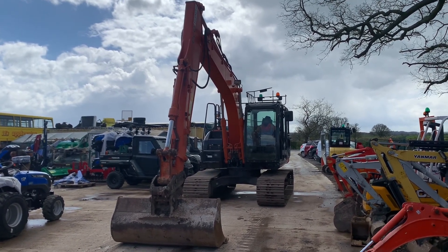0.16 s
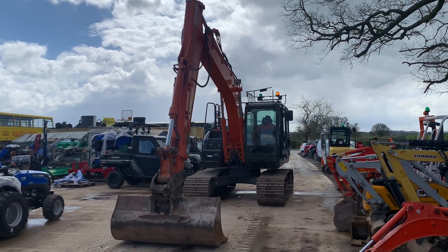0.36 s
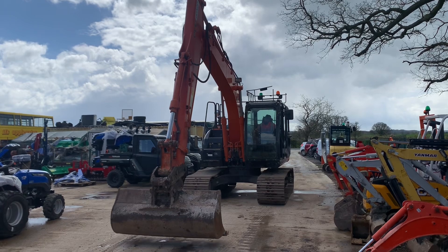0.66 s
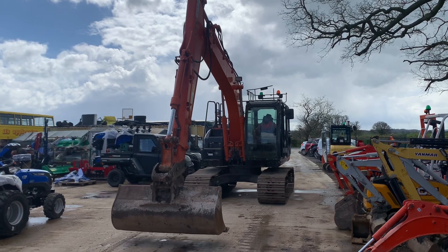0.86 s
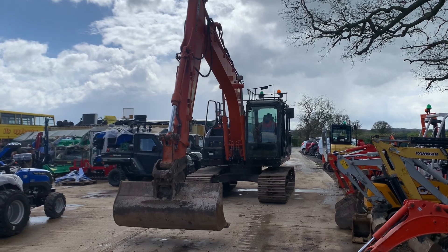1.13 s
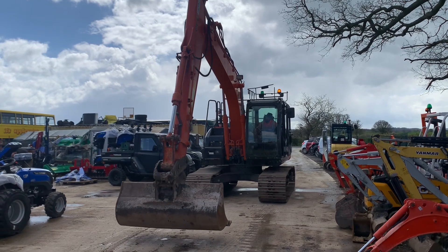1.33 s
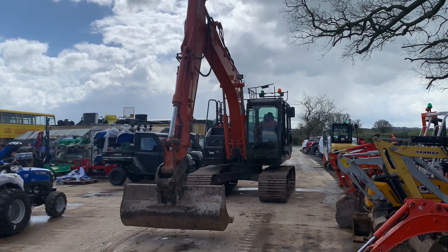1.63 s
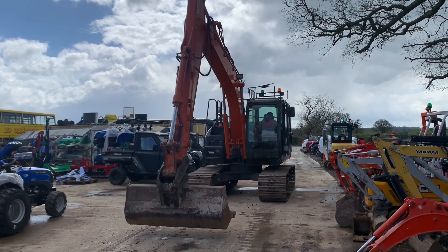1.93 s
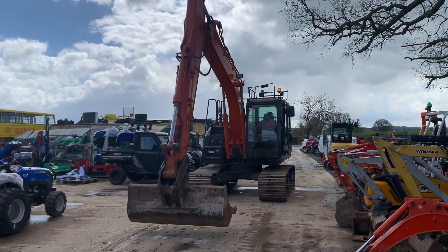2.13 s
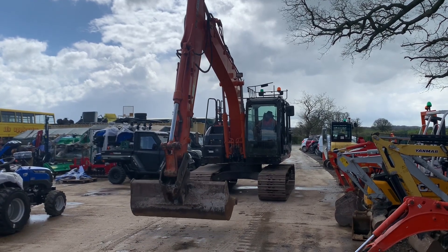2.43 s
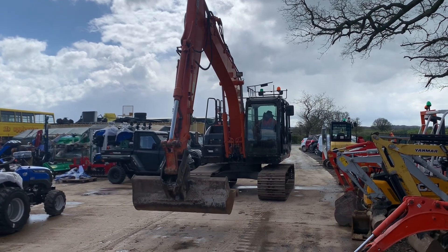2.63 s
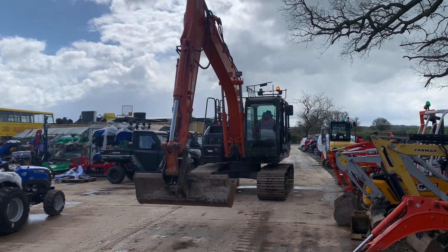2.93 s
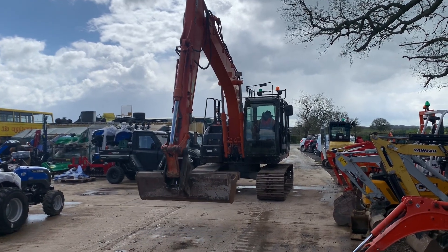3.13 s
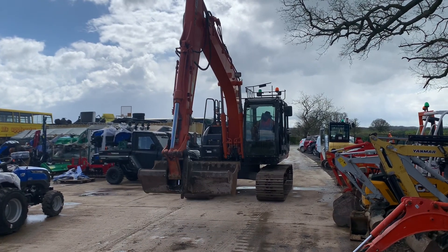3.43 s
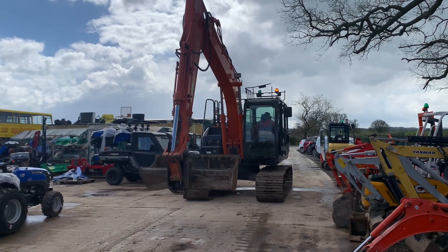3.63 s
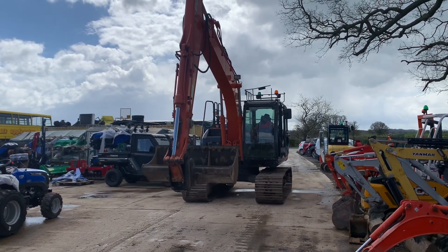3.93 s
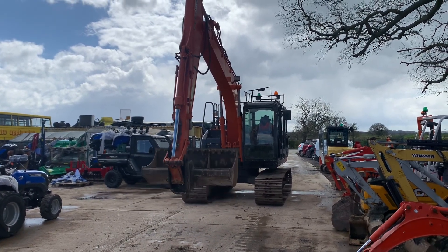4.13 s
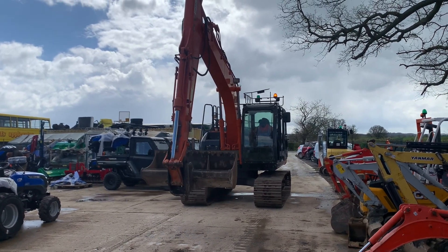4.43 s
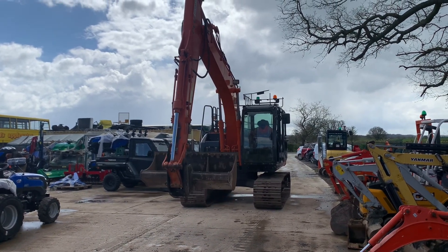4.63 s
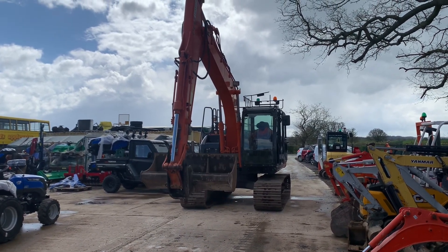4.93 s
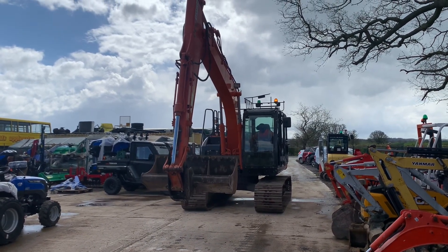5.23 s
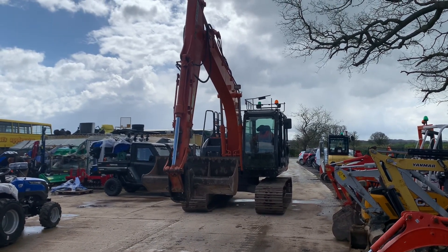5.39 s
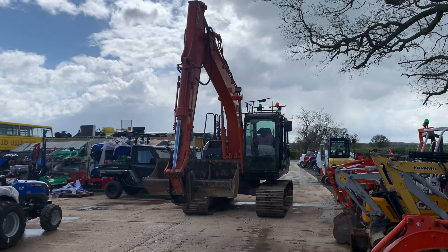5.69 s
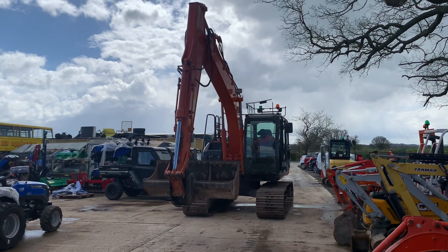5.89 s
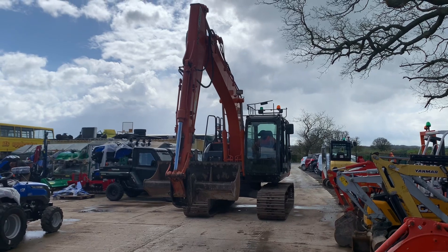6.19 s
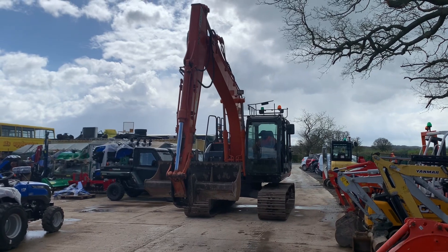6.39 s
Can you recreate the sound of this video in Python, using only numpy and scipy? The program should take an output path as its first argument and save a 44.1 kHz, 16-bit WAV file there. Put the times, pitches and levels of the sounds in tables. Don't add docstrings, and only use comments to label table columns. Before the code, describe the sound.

A distant excavator diesel drones steadily in a windy open yard, with faint hydraulic whistles, brief pin squeaks and a burst of dull metal clunks midway.

```python
import sys
import numpy as np
from scipy import signal
from scipy.fft import rfft, irfft, next_fast_len
from scipy.io import wavfile
from scipy.ndimage import uniform_filter1d, minimum_filter1d

SR = 44100
rng = np.random.default_rng(int(sys.argv[2]) if len(sys.argv) > 2 else 0)


def amplitude_ratio(level_db):
    exponent = np.asarray(level_db, float) / 20
    return 10 ** exponent


def digitize_waveform(pressure):
    field = np.atleast_2d(pressure).T
    bounded = np.clip(field, -1, 1)
    quanta = np.round(bounded * 32767).astype(np.int16)
    wavfile.write(sys.argv[1], SR, quanta)


N = 288855
T = np.arange(N) / SR

# t/s, pump load (0-1), valve opening (0-1)
WORK = [(0, 0.2, 0.9), (.5, 0.7, 1), (.85, 0.9, 0.71), (1.1, .95, 0.97), (1.6, 0.7, 0.82), (2.3, 0.9, 0.87),
        (2.7, 0.9, 0.92), (3.2, 0.06, 0.92), (3.9, 0, 0.64), (4.1, 0.6, 0.9), (4.7, 0.01, 0.7),
        (4.87, 0, 0.5), (5.05, 0.04, 0), (5.7, 0.03, .05), (5.97, 0.2, 0.4), (6.25, 0.5, 0.3),
        (6.55, 0.3, 0.4)]
CYLINDER_KNOCKS = [0, -5, -3, -6]


def evened(x):
    return x / np.sqrt(np.mean(x ** 2) + 1e-20)


def read(points, hz):
    f, value = np.transpose(points)
    return np.interp(np.log(hz + 1), np.log(f + 1), value)


def column(rows, count):
    return np.interp(T, np.transpose(rows)[0], np.transpose(rows)[count])


def shape(x, gain):
    size = next_fast_len(x.shape[-1] + 2048)
    spectrum = rfft(x, size) * gain(np.fft.rfftfreq(size, 1 / SR))
    return irfft(spectrum, size)[..., :x.shape[-1]]


def drift(hz):
    coarse = shape(rng.standard_normal(N // 32 + 1), lambda f: np.exp(-(f / 32 / hz) ** 2))
    return np.interp(T, np.arange(len(coarse)) * 32 / SR, evened(coarse))


def resonate(x, hz, width):
    r = np.exp(-np.pi * width / SR)
    pole = [1, -r * np.exp(2j * np.pi * hz / SR)]
    return 2 * signal.lfilter([(1 - r) ** 2], np.convolve(pole, pole), x).real


def add(mix, s, sound):
    part = mix[..., round(s * SR):][..., :sound.shape[-1]]
    part += sound[..., :part.shape[-1]]


def engine():
    # t/s, firing rate f/Hz
    firing = [(0, 46.5), (1.0, 46.6), (1.6, 47.4), (2.0, 46.8), (2.7, 46.8), (3.0, 47.4), (4.9, 47.4),
              (5.6, 47.1), (6.55, 47.0)]
    # multiple of the firing rate, rms level/dB
    pump = [(10, -61), (13.5, -57), (18, -59), (27, -65), (31.5, -66), (36, -65), (37.5, -66), (45, -69)]
    # multiple of the firing rate, level/dB re hum
    overtones = [(2, -14.5), (3, -15), (4, -21)]
    turns = np.cumsum(column(firing, count=1) + .05 * drift(3)) / SR
    hum_db, wobble_db = -27.5, -0.56
    hum = amplitude_ratio(hum_db + wobble_db * drift(4.4)) * np.sqrt(2) * np.sin(2 * np.pi * turns)
    for k, db in overtones:
        level = amplitude_ratio(hum_db + db + 3.5 * drift(6.5)) * np.sqrt(2)
        hum = hum + level * np.cos(2 * np.pi * k * turns + 0.72 * drift(2.2))

    cylinder = turns.astype(int) % len(CYLINDER_KNOCKS)
    blow = amplitude_ratio(np.take(CYLINDER_KNOCKS, cylinder) + 2.0 * drift(25))
    since = turns % 1
    noise = rng.standard_normal((2, N))
    gated = noise * (1 + .5 * blow * np.exp(-since / 5.0)) * amplitude_ratio(0.46 * drift(5.3))
    load, valve = column(WORK, count=1), column(WORK, count=2)
    knock_db = -61 + 14.5 * load
    loaded = np.clip((knock_db + 62) / 9 + .15 * drift(2), .4, 1)
    clatter = panelled(gated, loaded)
    clatter = clatter / shape(clatter, lambda f: (f > 1150) & (f < 2300)).std()
    clatter = clatter * amplitude_ratio(-54 + 1.5 + 3.5 * load + 3.5 * valve)

    whine = np.zeros(N)
    for k, db in pump:
        level = amplitude_ratio(db - 4.5 + 5.2 * drift(12)) * np.sqrt(2)
        whine = whine + level * np.sin(2 * np.pi * k * turns + 1.2 * drift(5.0))
    whine = whine * loaded
    return hum, clatter + hood(turns) + np.array([whine, np.roll(whine, 700)])


def panelled(x, loaded):
    # f/Hz, level/dB per Hz
    clatter_spectrum = [(60, 25.5), (200, 22), (300, 4), (430, 4), (640, 5), (740, 1.5), (850, 5),
                        (1000, 1.5), (1600, 0.5), (2150, -6.5), (2600, -13), (3300, -13.5), (4300, -26),
                        (7000, -53)]
    # f/Hz, width/Hz, level/dB over the clatter
    panels = [(500, 19, 4), (630, 14, 4), (822, 78, 8.5), (1282, 11, 9), (1479, 49, 8.5), (1690, 14, 1.5),
              (1826, 17, 12), (2080, 76, 9), (3560, 240, 3)]
    patch_db, patch_hz, patch_s = 1.5, 130, .3
    hz, t, z = signal.stft(x, SR, nperseg=2048, noverlap=1536)
    patches = rng.standard_normal(z.shape[1:])
    for _ in range(2):
        patches = uniform_filter1d(patches, round(patch_hz / hz[1]), axis=0)
        patches = uniform_filter1d(patches, round(patch_s / t[1]), axis=1)
    db = read(clatter_spectrum, hz)[:, None] + patch_db * evened(patches)
    at = np.minimum((t * SR).astype(int), N - 1)
    for f, width, top_db in panels:
        throb = .2 * np.sin(2 * np.pi * (7 * t + rng.random()))
        share = loaded[at] * np.clip(1 + .18 * drift(1.5)[at] + throb, 0, 1.6)
        centre = f * (1 + .005 * drift(3.9)[at])
        db = db + 4 * (1 - loaded[at]) / len(panels)
        db = db + top_db * share / (1 + (2 * (hz[:, None] - centre) / width) ** 2)
    return signal.istft(z * amplitude_ratio(db), SR, nperseg=2048, noverlap=1536)[1][:, :N]


def hood(turns):
    # f/Hz, width/Hz, level/dB, place in the cycle (firings)
    hood_parts = [(851, 45, -53, 3.4), (480, 49, -57.5, 1.5), (485, 25, -61.5, 3.2),
                  (625.8, 40, -57.5, 2.9), (616, 40, -60.5, 1.2), (1737, 56, -62.5, 3.0),
                  (1283, 60, -64.5, 1.7)]
    # t/s, level/dB
    shake = [(0, 1.5), (1.1, 3.5), (1.4, -3.5), (2.0, 1), (2.7, 0), (3.0, -4.5), (3.4, 1), (3.85, 0.5),
             (4.7, -5), (5.6, -10), (5.9, 2), (6.1, 1), (6.25, -5), (6.55, -2)]
    out, noise = 0, rng.standard_normal((2, N))
    for hz, width, db, place in hood_parts:
        cycle = (turns - place) / len(CYLINDER_KNOCKS)
        struck = np.diff(cycle // 1, prepend=-1) > 0
        rattle = .2 / 20 * noise * np.exp(-(cycle % 1) / 0.13)
        out = out + amplitude_ratio(db + 1 * drift(6.7)) * evened(resonate(struck + rattle, hz, width))
    return out * amplitude_ratio(column(shake, count=1))


def hydraulics():
    # f/Hz, level/dB per Hz
    hiss_spectrum = [(1500, -2), (3000, -0.5), (4000, 0.5), (5000, -0.5), (6300, -2), (8000, -8.5),
                     (10000, -19), (12000, -47.5)]
    # f/Hz, width/Hz, level/dB over the hiss
    strands = [(3270, 70, 5), (3470, 80, 4), (3850, 50, 7), (4090, 50, 6), (4200, 50, 6), (4390, 40, 6)]
    # start t/s, length/s, f/Hz, width/Hz, level/dB
    whistles_and_scrapes = [(.9, .35, 5820, 300, -74), (1.15, .45, 4180, 45, -69.5), (1.3, .25, 3490, 100, -70),
                            (1.36, .22, 3820, 60, -62.5), (1.35, .25, 7700, 90, -84), (1.4, .25, 8650, 90, -89),
                            (1.6, .32, 4085, 35, -61.5), (1.62, .22, 5030, 150, -74), (1.85, .14, 4040, 70, -65),
                            (1.98, .15, 3990, 80, -66), (1.99, .28, 3480, 55, -58), (2.0, .3, 3270, 90, -68),
                            (2.33, .15, 3930, 110, -68), (2.1, .4, 3825, 50, -69), (2.1, .3, 7730, 70, -77),
                            (2.2, .35, 4180, 50, -74), (2.3, .35, 3420, 130, -65), (2.78, .1, 4050, 140, -68),
                            (2.78, .12, 4300, 130, -70), (2.82, .35, 7750, 100, -80), (2.88, .11, 3760, 80, -62),
                            (2.95, .2, 3590, 120, -62), (2.8, .17, 3400, 90, -65), (2.95, .16, 3220, 80, -66),
                            (3.15, .35, 3480, 110, -69), (3.2, .6, 8650, 90, -89),
                            (3.99, .11, 1250, 380, -43), (4.2, .07, 4100, 220, -65), (4.38, .2, 5150, 200, -75),
               (4.44, .1, 1500, 700, -51), (4.44, .08, 3300, 1100, -60), (4.56, .12, 3300, 900, -61),
               (4.5, .3, 4000, 1600, -66), (4.55, .15, 1900, 700, -53), (1.3, .3, 5750, 250, -78),
               (5.435, .005, 6300, 1200, -75), (1.55, .55, 4190, 45, -69.5), (1.5, .14, 3960, 60, -69),
               (2.0, .2, 3600, 60, -68), (2.25, .35, 3480, 60, -66), (1.1, .2, 4080, 50, -72),
               (2.25, .85, 5750, 300, -77), (2.3, .5, 3250, 130, -69)]
    # start t/s, length/s, f/Hz, level/dB
    squeaks = [(3.751, .009, 2120, -45), (3.751, .01, 3620, -57), (3.897, .022, 3860, -55),
               (3.878, .018, 2040, -44), (3.884, .016, 2720, -53), (4.462, .03, 2900, -60),
               (3.56, .065, 3630, -52), (3.625, .04, 3635, -63), (3.94, .04, 3625, -55),
               (3.985, .018, 3550, -59), (4.006, .02, 3600, -56), (4.03, .015, 3600, -65)]

    def hiss_gain(f):
        peaks = sum(db / (1 + (2 * (f - hz) / width) ** 2) for hz, width, db in strands)
        return amplitude_ratio(read(hiss_spectrum, f) + peaks)

    oil = shape(rng.standard_normal((2, N)) * amplitude_ratio(0.53 * drift(13)), hiss_gain)
    oil = oil / shape(oil, lambda f: (f > 4400) & (f < 7500)).std()
    oil = oil * amplitude_ratio(-83.5 + 12.5 * column(WORK, count=2))

    flutter = drift(14)
    wander = 1 + .003 * drift(7)
    for s, length, hz, width, db in whistles_and_scrapes:
        s, length = s - .04, length + .08
        fuzz = rng.standard_normal((2, 2, round(length * SR)))
        fuzz = shape(fuzz, lambda f: np.exp(-(f / width) ** 2))
        pitch = hz * wander[round(s * SR):][:fuzz.shape[-1]]
        turn = np.exp(2j * np.pi * np.cumsum(pitch) / SR)
        tone = evened(((fuzz[0] + 1j * fuzz[1]) * turn).real)
        swell = signal.windows.tukey(len(turn), .7) * amplitude_ratio(.5 * flutter[round(s * SR):][:len(turn)])
        add(oil, s, amplitude_ratio(db) * tone * swell)

    waver = drift(40)
    for s, length, hz, db in squeaks:
        pitch = hz + 12 * waver[round(s * SR):][:round(length * SR)]
        turn = 2 * np.pi * np.cumsum(pitch) / SR
        tone = np.sqrt(2) * np.array([np.sin(turn), np.cos(turn)])
        add(oil, s, amplitude_ratio(db) * tone * signal.windows.tukey(len(turn), .6))
    return oil


def clunks():
    # t/s, middle ring level/dB, low ring level/dB, bright ring level/dB, t60/s
    knocks = [(3.74, -35.5, -47, -69.5, 0.045), (3.755, -37, -47, -68, 0.02),
              (3.871, -38, -33.5, -60, 0.16), (3.883, -28, -29.5, -44.5, 0.18),
              (3.904, -25, -37.5, -62, 0.088), (4.003, -56, -25, -59, 0.18), (4.03, -45, -41, -53.5, 0.26),
              (4.154, -28.5, -45.5, -45, 0.22), (4.166, -30.5, -35.5, -48, 0.29),
              (4.486, -38, -66, -57, 0.46), (5.069, -58, -53, -61, 0.12), (5.412, -47, -47, -59, 0.2),
              (5.925, -41, -32, -64, 0.082), (6.035, -44, -33.5, -66, 0.037), (6.357, -50, -45, -61, 0.069)]
    # f/Hz, width/Hz, level/dB
    steel = [
        [(580, 110, 0), (820, 90, -9)],
        [(1220, 380, 0), (1650, 300, -7), (2050, 300, -7), (2700, 500, -14)],
        [(3400, 600, 0), (3900, 350, -3), (4500, 600, -10), (5500, 1200, -21), (7400, 900, -22)],
    ]
    mode_gap_hz = 40
    out, t = np.zeros((2, N)), np.arange(SR // 2) / SR
    peaks = amplitude_ratio(3.8 * rng.standard_normal(SR // 2 // mode_gap_hz + 1).clip(-1.5, 2))
    for s, mid_db, low_db, bright_db, t60 in knocks:
        grit = amplitude_ratio(2.2 * np.interp(t / .004, np.arange(200), rng.standard_normal(200)))
        rattle = shape(grit * rng.standard_normal((2, len(t))),
                       lambda f: np.interp(f / mode_gap_hz, np.arange(len(peaks)), peaks))
        ringing = amplitude_ratio(-60 * t / t60)
        impact = .1 * np.exp(-t / .004)
        echo = amplitude_ratio(-17 - 60 * t / .35)
        fade = (1 - np.exp(-t / .002)) * (ringing + impact + echo)
        for db, modes in zip([low_db, mid_db, bright_db], steel):
            ring = shape(rattle, lambda f: sum(amplitude_ratio(g) * np.exp(-((f - hz) / w) ** 2) for hz, w, g in modes))
            add(out, s, amplitude_ratio(db - 6) * fade * evened(ring))
    return shape(out, lambda f: 1 / (1 + (f / 8500) ** 6))


def tinkles():
    # t/s, peak level/dB, t60/s
    rattles = [(3.815, -72, .05), (4.465, -72, .25), (4.61, -70, .2), (5.062, -79, .2), (5.41, -76, .2),
               (4.155, -72, .1)]
    out, t = np.zeros((2, N)), np.arange(SR // 4) / SR
    for s, db, t60 in rattles:
        grain_db = 2.5 * rng.exponential(1, len(t) // 128 + 1).clip(0, 4)
        grains = rng.standard_normal((2, len(t))) * amplitude_ratio(grain_db).repeat(128)[:len(t)]
        ring = shape(grains, lambda f: np.exp(-((f - 7200) / 2600) ** 2))
        add(out, s, amplitude_ratio(db - 60 * t / t60) * np.minimum(t / .006, 1) * evened(ring))
    return out


def wind():
    # t/s, peak level/dB, f/Hz
    slaps = [(0.044, -21.5, 396), (0.074, -15, 294.5), (0.09, -12, 332), (0.1034, -0.5, 340),
             (0.131, -8.5, 398), (0.193, -6, 262), (0.219, -6, 407), (0.29, -12, 295), (0.31, -18.5, 328),
             (0.345, -17.5, 425), (0.369, -14, 261), (0.393, -12, 246.5), (0.421, -13.5, 241),
             (0.455, -14, 332), (0.503, -20, 348), (0.66, -18.5, 338), (0.575, -19.5, 260.5),
             (0.981, -24, 302), (1.173, -21, 213.5), (1.271, -27.5, 200), (1.407, -22.5, 258),
             (2.229, -21.5, 206), (2.273, -26, 272.5), (2.355, -32, 381), (3.26, -22, 162),
             (3.375, -30, 183), (3.872, -18.5, 167), (4.249, -18.5, 216), (4.447, -19, 164.5),
             (4.527, -21.5, 205), (4.948, -19.5, 227.4), (5.599, -21, 180), (5.655, -21, 220),
             (5.953, -22, 181), (6.441, -25.5, 169.5)]
    # f/Hz, level/dB
    rumble = [(15, -55.5), (25, -22), (40, -14.5), (55, 5), (90, 0), (150, -3), (220, -20), (320, -22),
              (500, -68.5), (900, -120)]
    # f/Hz, level/dB
    flutter = [(40, -72.5), (80, -40.5), (160, -7), (230, 0), (380, -6), (520, -16), (800, -56),
               (1600, -120)]
    # f/Hz, level/dB
    edge = [(150, -71.5), (300, -20.5), (480, 2), (700, -6), (1100, -13.5), (2000, -38), (3000, -55.5),
            (5500, -120)]
    lumps = drift(33)
    rumble_db = gusts(count=2, lull_db=-33)
    flutter_db = gusts(count=3, lull_db=-48)
    out, spray, t = np.zeros((2, N)), np.zeros(N), np.arange(1500) / SR
    for s, db, hz in slaps:
        rise = 1 - np.exp(-t / .0014)
        swing = np.sin(2 * np.pi * hz * t) * t * hz * 8.3 * np.exp(-t * hz * 1.79)
        add(out, s, -amplitude_ratio(db - 2.5) * rise * swing)
        add(spray, s, amplitude_ratio(1.4 * db - 8) * rise * np.exp(-t / .012))
    out = shape(out, lambda f: (f > 20) / (1 + (f / 1100) ** 4))
    edge_level = amplitude_ratio(-30.0 + 1.86 * (flutter_db + 22.5)) + spray
    levels = [amplitude_ratio(rumble_db - 1.2), amplitude_ratio(flutter_db + 0.25), edge_level]
    for colour, lump_db, level in zip([rumble, flutter, edge], [1.5, 2.5, 1.5], levels):
        eddies = rng.standard_normal((2, N)) * amplitude_ratio(lump_db * lumps)
        out = out + level * evened(shape(eddies, lambda f: amplitude_ratio(read(colour, f))))
    return out


def gusts(count, lull_db):
    # peak t/s, length/s, rumble level/dB, flutter level/dB
    gust_rows = [(0.123, 0.034, -1.5, -34.5), (0.243, 0.29, -17.5, -20), (0.403, 0.051, -12.5, -24),
                 (0.668, 0.058, -12.5, -23), (0.848, 0.083, -29, -35.5), (1.019, 0.11, -21, -32),
                 (1.279, 0.026, -21, -27.5), (1.434, 0.056, -24.5, -46), (1.595, 0.03, -28, -31.5),
                 (1.711, 0.019, -20.5, -38), (1.837, 0.14, -22, -39.5), (2.097, 0.038, -22, -53),
                 (2.255, 0.1, -26, -44.5), (2.402, 0.16, -28, -44), (2.597, 0.045, -36, -64),
                 (3.186, 0.29, -34, -43.5), (3.361, 0.11, -16, -61.5), (3.577, 0.046, -24.5, -59),
                 (3.899, 0.05, -24.5, -28.5), (4.02, 0.12, -43, -30.5), (4.135, 0.066, -21.5, -31),
                 (4.305, 0.25, -23.5, -29.5), (4.469, 0.028, -16, -26.5), (4.6, 0.73, -33.5, -43),
                 (5.023, 0.093, -17, -35), (5.642, 0.06, -15.5, -28), (5.826, 0.036, -16, -34.5),
                 (5.969, 0.046, -25, -36.5), (6.28, 0.21, -26.5, -50), (6.469, 0.02, -27, -44)]
    t = T[::64]
    power = amplitude_ratio(2 * lull_db) + 0 * t
    for row in gust_rows:
        away = (t - row[0]) / row[1]
        lengths = np.where(away < 0, -away / 0.78, away)
        power = power + amplitude_ratio(2 * (row[count] - 12.5 * lengths ** 0.94))
    return np.interp(T, t, 10 * np.log10(power))


def cracks():
    # t/s, level/dB, top f/Hz
    bursts = [(.098, -32, 2100), (.1015, -22.5, 2100), (.107, -31, 1600), (.113, -37, 1500),
              (.131, -25, 900), (.138, -34, 1400), (.187, -40, 1300), (.1945, -33, 1700),
              (.2185, -35, 1700), (.25, -38, 1300), (.262, -39, 1300), (.293, -39, 1500), (.35, -42, 1700),
              (.358, -43, 1600), (.37, -31, 800), (2.351, -38, 900), (4.003, -33, 750), (4.308, -44, 1000),
              (6.034, -40, 950), (3.26, -43, 900), (3.315, -42, 1000)]
    rise_s = .0022
    out, t = np.zeros((2, N)), np.arange(1024) / SR
    for s, db, top_hz in bursts:
        burst = shape(rng.standard_normal((2, len(t))),
                      lambda f: (f > 450) / (f + 300) * np.exp(-(f / top_hz) ** 2))
        burst = (burst + burst[0]) * t / rise_s * np.exp(1 - t / rise_s)
        add(out, s, amplitude_ratio(db) * burst / burst[:, :256].std(axis=1, keepdims=True))
    return out


def self_noise():
    # f/Hz, level/dB per Hz
    floor = [(4000, -3), (7000, -2.5), (9000, -10), (11300, -11.5), (11500, -43.5), (12400, -45),
             (12700, -14), (13500, -17.5), (14500, -21.5)]
    noise = rng.standard_normal((2, N))
    return amplitude_ratio(-80) * evened(shape(noise, lambda f: amplitude_ratio(read(floor, f)) * (f > 2000)))


def ports(direct, scattered):
    # f/Hz, coherence (0-1)
    same = [(600, 0.91), (720, 0.44), (830, 0.68), (1250, 0.28), (2100, .8), (2800, 0.26), (3450, 0.31),
            (3800, 0.13), (4400, 0.44), (5200, 0.2), (7000, 0.14), (8600, 0.66), (10300, .5), (13000, .65)]
    # f/Hz, phase/rad
    lead = [(600, 0), (830, 2.5), (1200, 2.9), (1400, 4.8), (2070, 6), (2750, 6.3), (3100, 8.1),
            (3450, 8.2), (4130, 12.4), (4650, 12.9), (6000, 17.5), (7000, 21.3), (7750, 21.3), (8600, 25.1)]
    # f/Hz, level/dB
    tilt = [(700, 2), (1100, -3.5), (1500, -4), (2100, -2), (2900, -4), (4000, -2.5), (5200, -10),
            (6900, 0)]
    left = shape(direct, lambda f: read(same, f).clip(0, 1) * np.exp(1j * read(lead, f)))
    left = left + shape(scattered, lambda f: np.sqrt(1 - read(same, f).clip(0, 1) ** 2))
    left = shape(left, lambda f: amplitude_ratio(read(tilt, f) / 2))
    right = shape(direct, lambda f: amplitude_ratio(-read(tilt, f) / 2))
    return np.array([left, right])


def duck(x):
    power_db = 10 * np.log10(abs(uniform_filter1d((x ** 2).mean(0), size=2000)) + 1e-12)
    fall = T * 26.5
    held_db = np.maximum.accumulate(power_db + fall) - fall
    over_db = np.maximum(held_db + 19.5, 0)
    return x / amplitude_ratio(0.24 * uniform_filter1d(over_db, size=800))


def limit(x, ceiling):
    need = np.minimum(ceiling / (abs(x).max(0) + 1e-9), 1)
    return x * uniform_filter1d(minimum_filter1d(need, size=801), size=400)


def scene():
    hum, body = engine()
    direct, scattered = body + hydraulics() + clunks() + wind() + self_noise() + tinkles()
    return hum + ports(direct, scattered) + cracks()


def low_pass(x):
    return signal.sosfilt(signal.butter(12, 14450, fs=SR, output="sos"), x)


def record(dry):
    dry = limit(duck(dry), .88)
    mid, side = (dry[0] + dry[1]) / 2, (dry[0] - dry[1]) / 2
    mid = shape(mid, lambda f: 1 / (1 + (30 / (f + 1)) ** 4))
    side = shape(side, lambda f: 1 / (1 + (560 / (f + 1)) ** 9))
    bass = shape(mid, lambda f: f / 150 * np.exp(-(f / 260) ** 2))
    mid = mid + amplitude_ratio(-62.0) * bass * np.cos(np.pi / 2 * np.arange(N))
    return low_pass(np.array([mid + side, mid - side]))


dry = scene()
out = record(dry)
digitize_waveform(out)
```